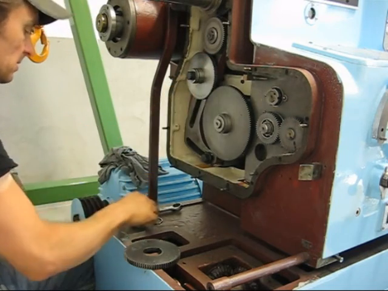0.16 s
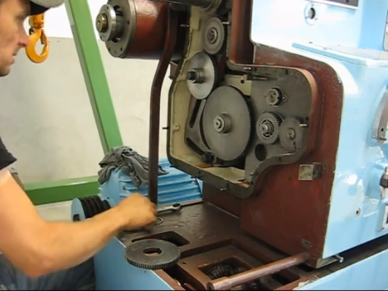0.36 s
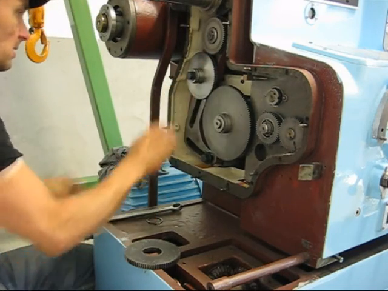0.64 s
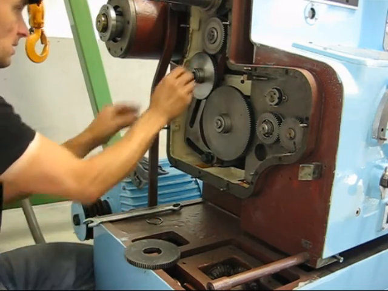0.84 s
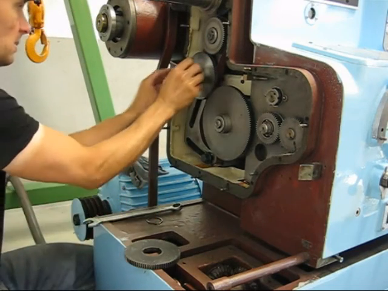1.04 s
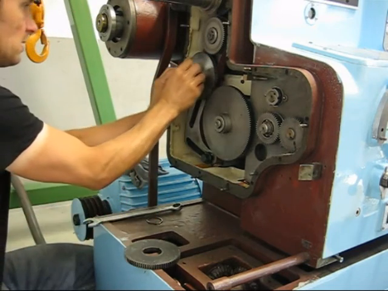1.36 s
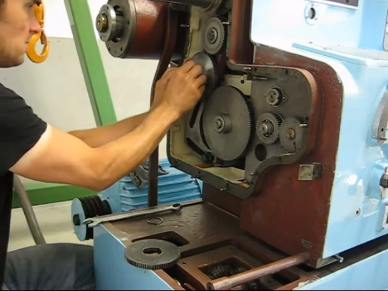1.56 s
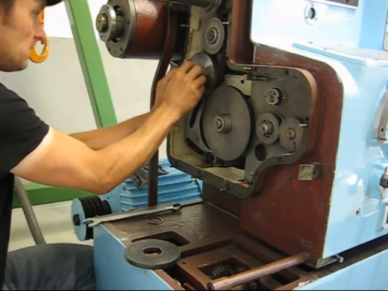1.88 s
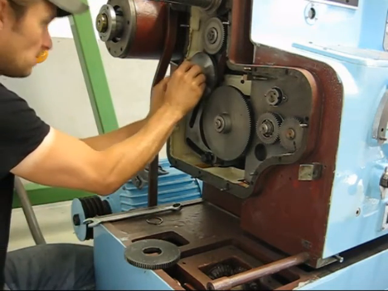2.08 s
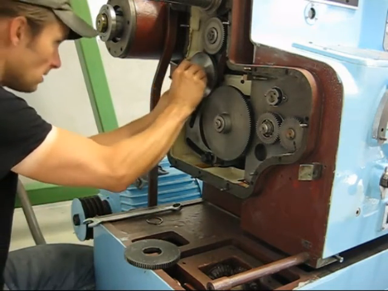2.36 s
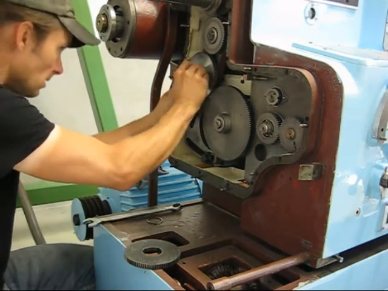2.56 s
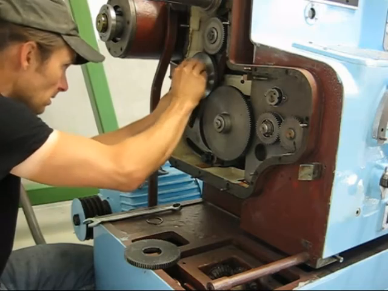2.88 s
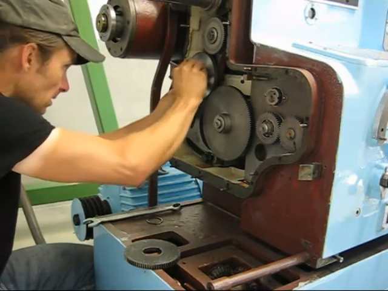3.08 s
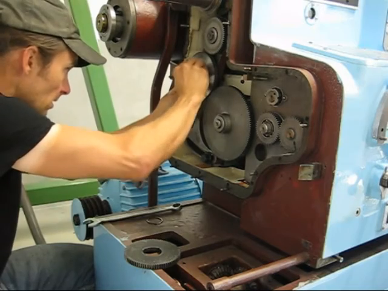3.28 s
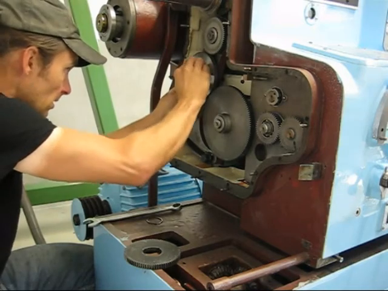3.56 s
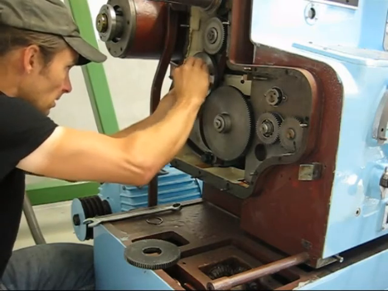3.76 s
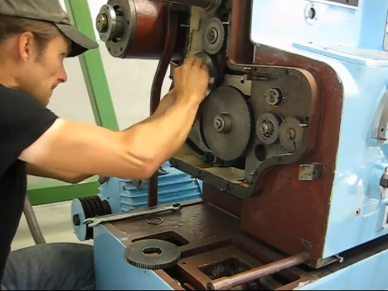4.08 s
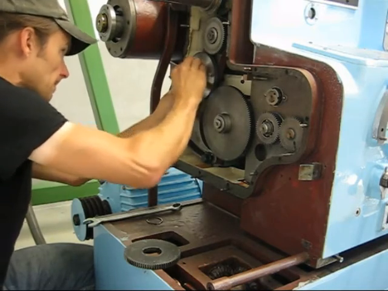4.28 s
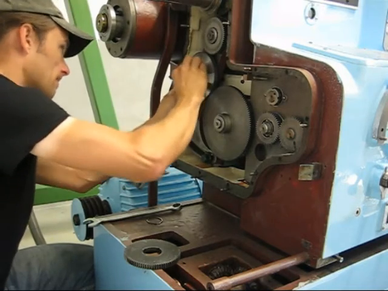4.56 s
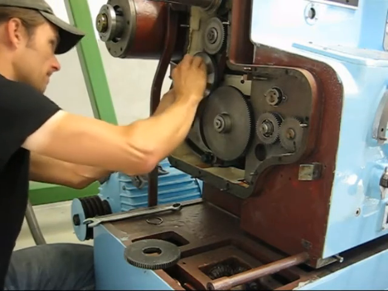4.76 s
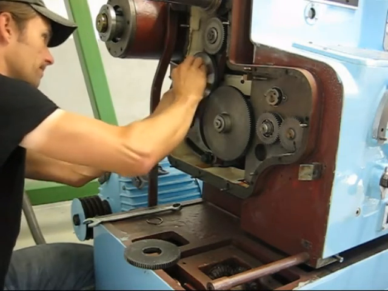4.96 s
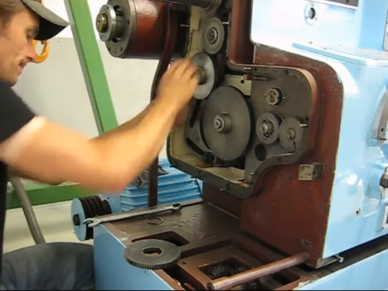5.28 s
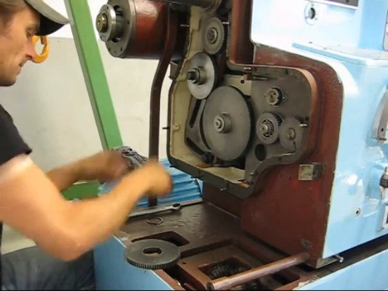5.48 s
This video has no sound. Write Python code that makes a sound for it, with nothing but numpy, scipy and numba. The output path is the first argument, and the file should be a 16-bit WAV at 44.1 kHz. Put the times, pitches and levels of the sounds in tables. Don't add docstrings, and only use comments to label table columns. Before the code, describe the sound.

In a hard-walled machine shop with low rumble, hum, hiss and a thin high whine, a rag rustles softly. A part smacks a tray, then collar, shaft, gear and casing clank in quick succession. Sparse faint ticks follow, a bright seating click at about three seconds, and finally a violent distorted bang. Close small camera microphone, left channel only.

```python
import sys
import numpy as np
from scipy import signal
from scipy.fft import rfft, irfft, next_fast_len
from scipy.io import wavfile
from scipy.ndimage import uniform_filter1d
from numba import njit

SR = 44100
rng = np.random.default_rng(int(sys.argv[2]) if len(sys.argv) > 2 else 0)


def voltage_ratio(decibels):
    exponent = np.asarray(decibels, float) / 20
    return 10 ** exponent


def wav_record(signal):
    frames = np.transpose(np.atleast_2d(signal))
    bounded = np.clip(frames, -1, 1)
    quanta = np.round(bounded * 32767).astype(np.int16)
    wavfile.write(sys.argv[1], SR, quanta)


N = 248444

# [Hz, dB per Hz]
SHOP_SPECTRUM = [(15, -33), (25, -6.5), (200, -3.5), (640, -4.5), (7000, -14.5), (9100, -13), (15400, -120)]
# [Hz, Hz, dB]
RESONANCE_MODES = [(5450, 340, -5.5)]
# [Hz, dB]
HUM_PARTIALS = [(199.2, -72.5), (398.4, -71.5), (602.9, -74)]
# [s, dB]
RAG_WIPES = [
    (.12, -49),
    (.47, -49.5),
    (.66, -60.5),
]
# [Hz, Hz, dB]
READOUT_CLOCKS = [(7560, 8.6, -43.5), (7852.2, 14.5, -56.5), (11045.7, .1, -65)]
# [Hz, dB per Hz]
HISS_SPECTRUM = [(100, -21), (1000, -3), (5400, -1), (6800, -3), (8000, 2.5), (10000, 8.5), (13000, -4)]

# [s, dB, dB]
TOOTH_TICKS = [(.258, -40, -17), (4.063, -29.5, 8), (4.249, -38, -12)]
RIM_TICKS = [(1.163, -34.5, -17), (1.175, -39, -27)]
HUB_TICKS = [(1.749, -45, 8), (2.016, -35.5, 27), (3.972, -36, 2), (4.3867, -32.5, -2), (4.398, -32, 2)]
STUD_TICKS = [(1.922, -35, -7), (2.239, -40, -11), (2.265, -46.5, -23), (2.34, -48, -21),
              (2.753, -39.5, -15), (3.101, -40, -10), (3.982, -35, -3), (5.556, -43, -12), (4.418, -18, 3)]
COVER_TICKS = [(2.336, -37, -17), (2.745, -35.5, -5), (3.81, -33, -9), (5.549, -38.5, -1)]
# [Hz, Hz, Hz, ms]
TOOTH_TOUCH = (5330, 50, 10600, 3.6)
RIM_TOUCH = (11650, 80, 11000, 5.4)
HUB_TOUCH = (820, 130, 2230, 4.8)
STUD_TOUCH = (3110, 40, 2500, 2.4)
COVER_TOUCH = (816, 200, 2040, 3.6)

# [Hz, Hz, dB]
TRAY_MODES = [(830, 96, -1), (3300, 460, -4), (5160, 310, -16)]
COLLAR_MODES = [(1646, 42, -9), (2010, 24, -8.5), (3080, 80, -31), (3710, 59, -3.5), (5190, 90, -4.5),
                (8300, 51, -25), (11600, 35, -13)]
SHAFT_MODES = [(1210, 15, 1), (2070, 45, -5), (2414, 43, 4.5), (3270, 84, 8), (3740, 95, 2), (5140, 96, -6),
               (8800, 81, -19), (11600, 60, -16)]
GEAR_MODES = [(2370, 52, -12), (3820, 78, -1), (3860, 57, 9), (4370, 300, -27), (5300, 35, -3.5),
              (8750, 190, -35), (11600, 90, -11)]
CASING_MODES = [(900, 41, -20), (1730, 85, -3.5), (2246, 120, -3.5), (3660, 120, 4.5), (5200, 130, -2),
                (8650, 110, -12), (11300, 66, -7)]
STUD_MODES = [(1040, 180, -12.5), (2480, 110, -9.5), (3085, 74, 2), (5400, 430, -15.5), (8500, 210, -17)]
DROPPED_MODES = [(383, 25, -11), (585, 130, -21.5), (1050, 124, -12.5), (2130, 210, -4), (3130, 190, -3.5),
                 (5120, 370, 4.5), (5530, 490, 6.5), (8650, 350, -2), (10600, 680, -1)]
# [Hz, dB per Hz]
SHARP_CRACK = [(300, -18), (800, -11), (2000, -8.5), (3300, 2), (4500, 2.5), (7500, -7), (10500, -11.5),
               (13000, -18)]
DULL_CRACK = [(300, -17.5), (800, 0.5), (1500, -2), (2500, 4), (4000, 1), (6000, -37), (9000, -14),
              (13000, -30)]
STRUCK_CRACK = [(300, -19.5), (800, 4.5), (1600, -7), (2500, 2.5), (4000, -1.5), (5500, 2.5), (7500, -46),
                (13000, -4.5)]
BRIGHT_CRACK = [(300, -45), (1200, -8), (2500, -4), (4500, 2), (6500, -12), (9000, -8.5), (13000, -26)]
SEATING_CRACK = [(300, -26), (700, -8), (1100, 0), (2000, -4), (4000, -5.5), (6000, -7), (8500, -8),
                 (13000, -24.5)]
BANG_CRACK = [(300, -58), (700, -13.5), (1500, -9.5), (5500, -2), (7000, -3), (10000, 5.5), (11200, -24),
              (13000, -7)]
# [s, dB, ms, dB per Hz, dB]
TRAY_BLOWS = [
    (.7337, -8, 0.513, 2, -10),
    (.735, -8.5, 1, 15, -19),
]
COLLAR_BLOWS = [
    (.955, -15, 2.93, -22, -13.5),
]
SHAFT_BLOWS = [
    (.9932, -16, 1.35, 11, -9.5),
    (.9962, -17, 2.1, -12.5, -19),
    (.9995, -15, 1.3, -28, -51),
]
SLIDE_BLOWS = [
    (1.162, -30, 1.8, -11, -7),
    (1.169, -28.5, 5.2, -9, -19),
]
GEAR_BLOWS = [
    (1.247, -49, 2.9, -27, -15),
    (1.258, -25, 2.5, -1, -4),
    (1.2645, -5.5, 0.85, -49, -19),
]
CASING_BLOWS = [
    (1.304, -14.5, 1.8, 5, -13),
    (1.3078, -26, 1.2, 1, -12),
    (1.312, -10, 3.1, -8.5, -15.5),
]
STUD_BLOWS = [
    (3.337, -30, 4.2, -21, -18),
    (3.3465, -14, 1.75, -5, -8.5),
    (3.3515, -12, 1.2, -32, -26),
    (3.358, -18.5, 2.05, -31, -16),
]
STUD_CLICKS = [
    (3.3427, -9, 0.74, 6, -37),
    (3.3443, -9, 1, 6, -41),
]
DROP_BLOWS = [
    (4.4215, 20.17, 3.48, -5, -12.5),
]

# [Hz, s]
ROOM_T60 = [(300, 0.55), (1000, 0.97), (2500, 0.64), (5500, 0.56), (9000, 0.44), (12000, 0.32)]
# [Hz, Hz]
THUMP_BAND = (335, 775)
# [Hz, dB]
CONVERTER_FILTER = [(9000, -1), (10700, 0), (11500, -5.5), (12200, -15), (12800, -32), (14000, -22)]


def level(x, db):
    return x * voltage_ratio(db) / np.sqrt(np.mean(x ** 2))


def colour(x, points, broad_db=0, modes=()):
    size = 2 * next_fast_len(len(x))
    f = np.arange(size // 2 + 1) * SR / size + 1
    hz, db = np.transpose(points)
    power = voltage_ratio(np.interp(np.log(f), np.log(hz), db) + broad_db) ** 2
    for centre, width, mode_db in modes:
        power += voltage_ratio(mode_db) ** 2 / (1 + ((f - centre ** 2 / f) / width) ** 2)
    cepstrum = irfft(np.log(power) / 2)
    cepstrum[1:size // 2] *= 2
    cepstrum[size // 2 + 1:] = 0
    response = np.exp(rfft(cepstrum))
    return irfft(rfft(x, size) * response)[:len(x)]


def machinery():
    return level(colour(rng.standard_normal(N), SHOP_SPECTRUM, modes=RESONANCE_MODES), -55.5)


def transformer_hum():
    t = np.arange(N) / SR
    return sum(voltage_ratio(db + 5.5) * np.sin(2 * np.pi * (hz * t + rng.random())) for hz, db in HUM_PARTIALS)


def amplifier_hiss():
    return level(colour(rng.standard_normal(N), HISS_SPECTRUM), -50.5)


def readout_whine():
    frame_hz, restart_s = 30, .0285
    t = np.arange(N) / SR
    since_frame = uniform_filter1d((t - restart_s) % (1 / frame_hz), size=90)
    whine = 0
    for hz, excess_hz, db in READOUT_CLOCKS:
        whine = whine + voltage_ratio(db + 3.1) * np.sin(2 * np.pi * (hz * t + excess_hz * since_frame))
    return whine


def rag_rustle():
    rise_db_per_s, fall_db_per_s = 76, 47
    t = np.arange(N) / SR
    spectrum = [(1000, -7.5), (3000, -2.5), (6000, -2.5), (9000, -11.5)]
    rustle = level(colour(rng.standard_normal(N), spectrum), 0)
    wipes = 0
    for s, db in RAG_WIPES:
        drop_db = np.maximum((s - t) * rise_db_per_s, (t - s) * fall_db_per_s)
        wipes = wipes + voltage_ratio(db - drop_db)
    return rustle * wipes


def push(contact_ms):
    age = 1000 * np.arange(SR // 8) / SR / contact_ms
    fade = np.exp(-age) - np.exp(-age / 0.16)
    fade = 1.7 * fade / np.sqrt(np.sum(fade ** 2))
    force = fade * rng.standard_normal(len(fade))
    for _ in range(6):
        flat = irfft(np.exp(1j * np.angle(rfft(force))), len(fade))
        force = np.clip(flat, -fade, fade)
    return force


def blow(contact_ms, modes, crack, crack_db):
    sound = colour(push(contact_ms), crack, crack_db, modes)
    return sound / abs(sound).max()


def add(track, s, sound):
    i = int(s * SR)
    track[..., i:i + sound.shape[-1]] += sound[..., :N - i]


def light_touches():
    paths = np.zeros((2, N))
    room_db = -5
    for ticks, touch in [(TOOTH_TICKS, TOOTH_TOUCH), (RIM_TICKS, RIM_TOUCH), (HUB_TICKS, HUB_TOUCH),
                         (STUD_TICKS, STUD_TOUCH), (COVER_TICKS, COVER_TOUCH)]:
        ring_hz, width_hz, crack_hz, contact_ms = touch
        crack = [(crack_hz / 3, -15), (crack_hz, 0), (crack_hz * 2, -10), (crack_hz * 3, -30)]
        for s, db, crack_db in ticks:
            sound = blow(contact_ms, [(ring_hz, width_hz, 0)], crack, crack_db)
            add(paths, s, sound * voltage_ratio([[db], [db + room_db]]))
    return paths


def steel_blows():
    paths = np.zeros((2, N))
    for blows, modes, crack in [(TRAY_BLOWS, TRAY_MODES, SHARP_CRACK),
                                (COLLAR_BLOWS, COLLAR_MODES, DULL_CRACK),
                                (SHAFT_BLOWS, SHAFT_MODES, DULL_CRACK),
                                (SLIDE_BLOWS, COLLAR_MODES, DULL_CRACK),
                                (GEAR_BLOWS, GEAR_MODES, SHARP_CRACK),
                                (CASING_BLOWS, CASING_MODES, STRUCK_CRACK),
                                (STUD_BLOWS, STUD_MODES, SEATING_CRACK),
                                (STUD_CLICKS, STUD_MODES, BRIGHT_CRACK),
                                (DROP_BLOWS, DROPPED_MODES, BANG_CRACK)]:
        for s, db, contact_ms, crack_db, room_db in blows:
            sound = blow(contact_ms, modes, crack, crack_db)
            add(paths, s, sound * voltage_ratio([[db], [db + 11 + room_db]]))
    return paths


def room(x):
    t = np.arange(int(1.5 * SR)) / SR
    hz, t60 = np.transpose(ROOM_T60)
    tail = 0
    for centre in 150 * 2. ** np.arange(0, 7, .5):
        band = [centre / 2 ** .25, centre * 2 ** .25]
        sos = signal.butter(2, band, "band", fs=SR, output="sos")
        fall_db = -60 * t / np.interp(np.log(centre), np.log(hz), t60)
        fade = voltage_ratio(fall_db) + voltage_ratio(-26.0 + 0.34 * fall_db)
        tail = tail + signal.sosfilt(sos, rng.standard_normal(len(t))) * fade
    tail *= 1 - np.exp(-t / 0.0025)
    return signal.fftconvolve(x, tail / np.sqrt(np.sum(tail ** 2)))[:N]


@njit
def follow(x, top, attack, release, spring):
    gain, held, g = np.empty(len(x)), top, 1.
    for i in range(len(x)):
        held = max(abs(x[i]), held * release * (top / held) ** spring, top)
        g *= (top / held / g) ** attack
        gain[i] = g
    return gain


def overload(x):
    clipped = np.clip(x, -.7, .7)
    excess = np.tanh(abs(x - clipped))
    b, a = signal.butter(2, THUMP_BAND, "band", fs=SR)
    return clipped + voltage_ratio(-6.5) * signal.lfilter(b, a, excess)


def scene():
    background = machinery() + transformer_hum() + rag_rustle()
    direct, sent = light_touches() + steel_blows()
    live = 2 * (direct + room(sent) + background)
    return np.array([live, 0 * live])


def low_pass(x):
    return signal.sosfilt(signal.butter(12, 12760, fs=SR, output="sos"), x)


def record(dry):
    attack = 1 / (0.0054 * SR)
    release = float(voltage_ratio(-60 / SR))
    spring = 1 / (.25 * SR)
    gain = follow(dry[0], float(voltage_ratio(-4.0)), attack, release, spring)
    live = overload(dry[0] * gain)
    live = colour(live + 2 * amplifier_hiss(), CONVERTER_FILTER)
    live = live + 2 * readout_whine() * gain
    return low_pass(np.array([live, 0 * live]))


dry = scene()
out = record(dry)
wav_record(out)
```